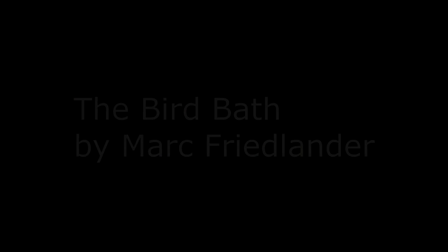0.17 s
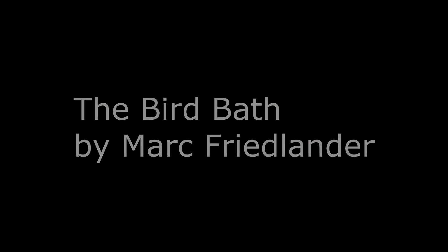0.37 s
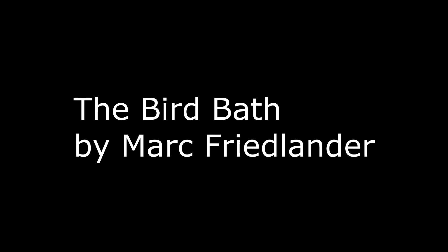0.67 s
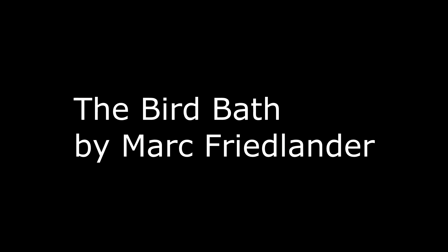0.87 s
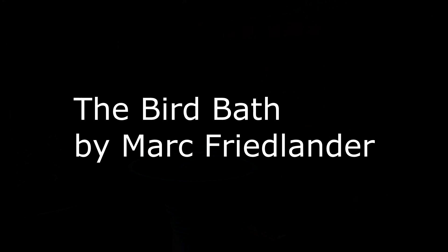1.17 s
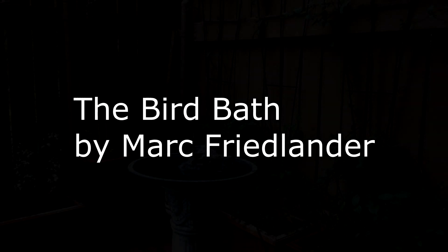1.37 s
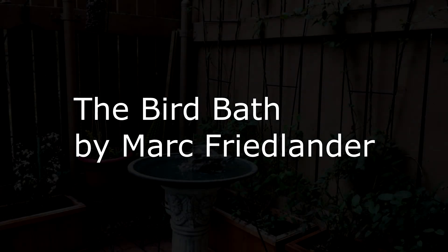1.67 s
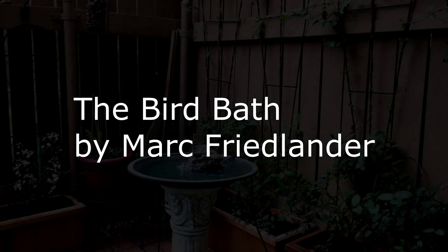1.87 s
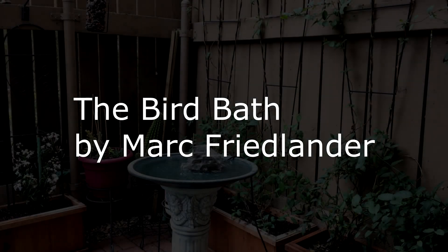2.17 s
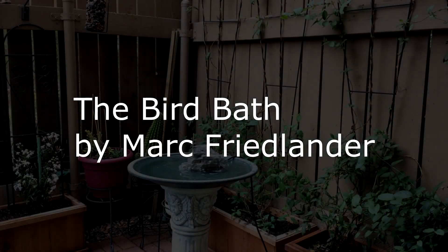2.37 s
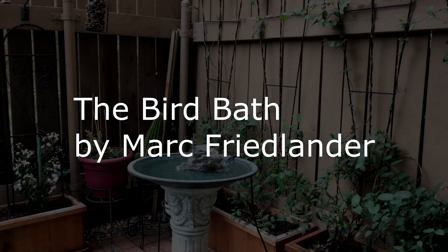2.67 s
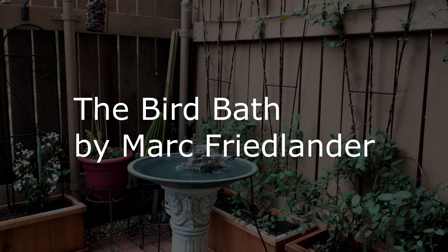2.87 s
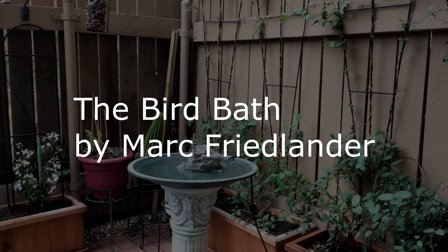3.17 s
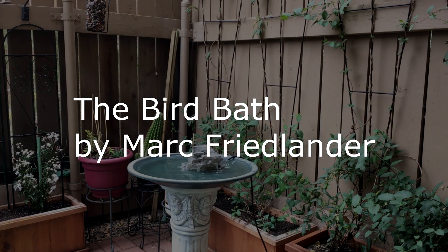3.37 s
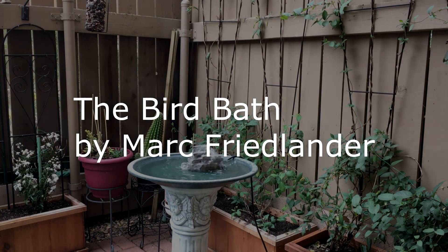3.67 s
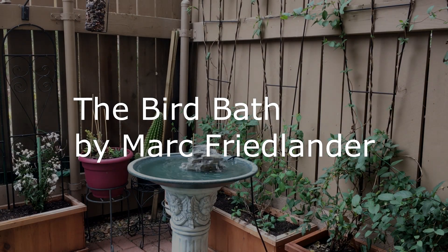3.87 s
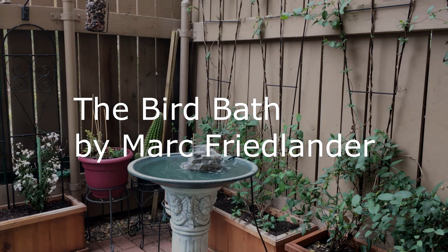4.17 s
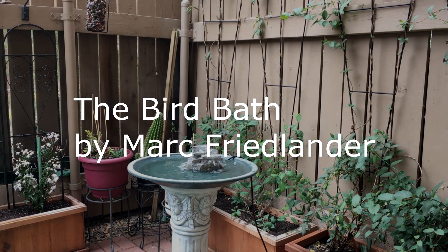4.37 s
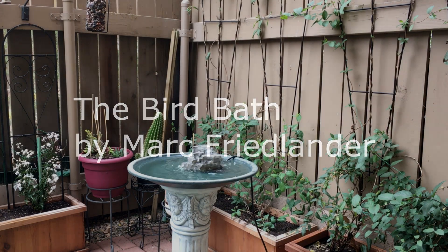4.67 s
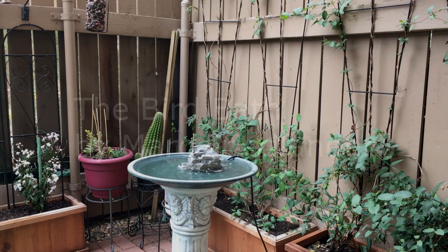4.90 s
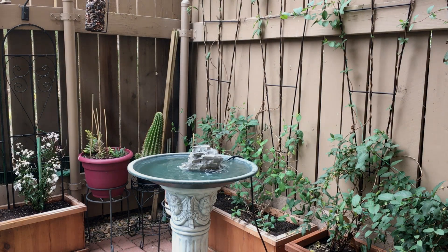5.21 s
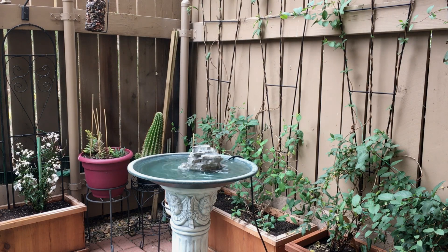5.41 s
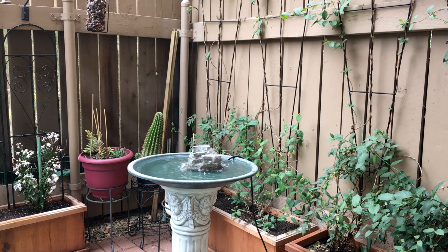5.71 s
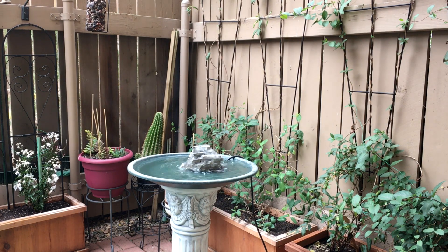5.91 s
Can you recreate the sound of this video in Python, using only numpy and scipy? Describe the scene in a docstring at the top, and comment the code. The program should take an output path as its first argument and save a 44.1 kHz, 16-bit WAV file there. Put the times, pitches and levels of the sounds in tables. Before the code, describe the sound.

Water drips and gurgles into a shallow basin, fading in, with brief falling chirps and a passing engine swelling midway behind a low rumble.

```python
"""On a fenced patio a small fountain trickles into a birdbath; the sound fades in.
Splashes and drops are short noisy rings; bubbles, plinks and glugs are decaying sines.
Nearby birds chirp in falling tones with overtones, and a farther one trills with a fast warble.
Beyond the fence a vehicle accelerates past: engine harmonics through resonances, and tyre noise.
Farthest off, filtered noise makes the town's rumble and traffic; the pump's hum is two steady tones."""
import sys
import numpy as np
from scipy import signal
from scipy.fft import rfft, irfft, next_fast_len
from scipy.io import wavfile

SR = 44100
rng = np.random.default_rng(int(sys.argv[2]) if len(sys.argv) > 2 else 0)


def store_wav(level_fs):
    """Save 16-bit WAV to argv[1]."""
    pcm = np.round(np.clip(np.atleast_2d(level_fs), -1, 1) * 32767)
    wavfile.write(sys.argv[1], SR, pcm.T.astype(np.int16))


N = 266716
TIME = np.arange(N) / SR  # s

# the town's low rumble, spectrum shape: pitch_hz [Hz], relative_db [dB]
RUMBLE_SPECTRUM = [(20, -41), (30, -16), (40, -10.5), (60, 4), (85, -4.5), (115, -3), (160, -21.5),
                   (300, -59), (800, -56.5)]
# low surges, the brief one at 2.38 s a thump as the vehicle pulls away: # start_s [s, already at full height],
# length_s [s], level_db [dB]
RUMBLE_SURGES = [(0.496, 0.077, -41.5), (2.376, 0.032, -53), (3.447, 0.19, -58), (4.85, 1.6, -56)]
# distant traffic hiss, spectrum shape: pitch_hz [Hz], relative_db [dB]
TRAFFIC_SPECTRUM = [(60, -7.5), (160, 5), (290, -0.5), (480, -11.5), (1000, -16), (2500, -28.5),
                    (6000, -37), (10000, -37.5), (16000, -55)]
# steady tones of the pump: pitch_hz [Hz], level_db [dB rms, before a slight waver]
PUMP_HUM = [(119.95, -48.5), (239.9, -77.5)]
# resonances of the exhaust as heard over the fence: pitch_hz [Hz], relative_db [dB]
EXHAUST_RESONANCES = [(55, 5), (110, 7.5), (115, 11), (120, 3.5), (175, -15.5), (215, -11), (236, 4),
                      (252, -7), (272, 0), (298, -8.5), (325, -1), (340, 1.5), (356, -5), (385, -5.5),
                      (405, -14.5), (428, -1.5), (452, -19), (490, -23.5), (537, -16), (562, -32),
                      (590, -12.5), (650, -17.5), (810, -32), (875, -19.5), (1000, -28)]
# tyres on the road, spectrum shape: pitch_hz [Hz], relative_db [dB]
TYRE_SPECTRUM = [(25, -22), (60, 12), (150, -4), (330, 6), (520, -2.5), (680, 0.5), (900, -11.5),
                 (1200, -16.5), (2500, -30), (5000, -73)]
# thin high trills of the farther bird: start_s [s], length_s [s], pitch_hz [Hz], level_db [dB]
FAR_TRILLS = [(0.688, 0.081, 7400, -56), (1.148, 0.21, 7400, -64), (4.121, 0.077, 7530, -62),
              (4.746, 0.16, 7430, -56.5)]
# falling chirps nearby, some with a softer, lower side note:
# start_s [s], length_s [s], top_hz [Hz], last_hz [Hz], level_db [dB, before the effort curve]
NEAR_CHIRPS = [(0.754, 0.081, 3960, 2770, -40), (1.916, 0.073, 4176, 2800, -44.5),
               (2.197, 0.036, 3150, 2730, -47.5), (4.399, 0.066, 4095, 2826, -41.5),
               (4.445, 0.038, 3245, 2950, -43.5), (4.976, 0.035, 3260, 2930, -50),
               (4.983, 0.078, 4010, 2730, -44), (5.228, 0.04, 3585, 3070, -39),
               (5.261, 0.062, 4200, 3000, -36.5)]
# partials of a chirp: multiple [of its pitch], relative_db [dB]
CHIRP_OVERTONES = [(1, -0.5), (2, -19.5), (3, -17), (4, -37)]
# how long the patio echoes: pitch_hz [Hz], t60_s [s, at a linger of 1]
PATIO_DECAY = [(500, 0.15), (2000, 0.15), (4000, 0.17), (8000, 0.16), (15000, 0.22)]
# the fine spatter, spectrum shape: pitch_hz [Hz], relative_db [dB]
SPATTER_SPECTRUM = [(400, -44), (1000, -11), (2000, 11.5), (2700, -10), (3300, 4), (4200, -0.5),
                    (4900, -4.5), (6000, 1), (9300, -1.5), (12000, 5.5), (16000, 4)]
# glugs, where the stream digs in and drags air under:
# start_s [s], length_s [s], level_db [dB rms, before the echo], first_hz [Hz], last_hz [Hz]
STREAM_GLUGS = [(0.692, 0.036, -59, 1570, 1740), (0.729, 0.042, -60.5, 1800, 1820),
                (2.207, 0.11, -68, 1160, 1420), (2.326, 0.051, -63, 1690, 2240),
                (2.374, 0.097, -69, 1750, 1600), (2.471, 0.019, -54.5, 1930, 3020),
                (2.498, 0.024, -58.5, 2340, 2220), (2.678, 0.056, -66.5, 2230, 2200),
                (4.565, 0.11, -62, 1410, 1520), (4.665, 0.041, -58, 1860, 1950),
                (4.722, 0.028, -64, 2420, 2620), (4.761, 0.04, -58.5, 1790, 1870),
                (4.816, 0.054, -66.5, 2190, 2260), (4.861, 0.063, -60.5, 1820, 1370),
                (4.934, 0.027, -56.5, 1700, 2640)]
# the clearest short ringing plinks, from bubbles and small drops:
# start_s [s], level_db [dB, before a common trim], pitch_hz [Hz]
CLEAR_PLINKS = [(0.232, -44, 2320), (0.385, -45.5, 3130), (0.398, -45.5, 1740), (0.428, -44.5, 1003),
                (0.517, -47.5, 3450), (0.614, -34.5, 1680), (0.652, -43.5, 3700), (0.741, -44.5, 5050),
                (0.763, -48, 1120), (1.023, -43, 1174), (1.0455, -49, 4350), (1.232, -49, 4080),
                (1.3523, -44.5, 3680), (1.3784, -40.5, 958), (1.516, -48.5, 3140), (1.52, -49, 6370),
                (1.7015, -47.5, 3030), (1.7748, -42, 4260), (2.198, -45.5, 998), (2.473, -46, 1970),
                (2.505, -44, 2300), (2.508, -40.5, 1535), (2.588, -53, 860), (2.635, -34.5, 4150),
                (2.712, -59, 6400), (2.795, -47.5, 2630), (2.859, -44, 2570), (2.965, -44, 1970),
                (3.04, -51, 5330), (3.103, -47.5, 3460), (3.1858, -43.5, 3720), (3.57, -50, 1530),
                (3.607, -49, 3880), (3.636, -51, 1070), (3.657, -54, 5700), (3.72, -51.5, 1216),
                (3.882, -50, 2650), (3.989, -54, 1110), (3.97, -52, 3780), (4.055, -50.5, 1848),
                (4.085, -52.5, 1280), (4.178, -36.5, 3130), (4.361, -47.5, 1817), (4.442, -46.5, 2500),
                (4.59, -36, 1403), (4.643, -46.5, 5000), (4.679, -42, 1840), (4.7476, -52, 4330),
                (4.911, -51, 1540), (4.91, -47, 1037), (4.948, -47, 2570), (5.034, -49.5, 1000),
                (5.1606, -47.5, 3520), (5.4412, -47, 2470), (5.491, -53, 6060), (5.503, -49.5, 2650),
                (5.5788, -48, 1086), (5.625, -49, 1060), (5.828, -52, 990), (5.8863, -41.5, 1876)]
# the loudest drops that smack the water: start_s [s], level_db [dB, direct and fence echo together],
# pitch_hz [Hz, centre of the tick], ring [cycles], echo_db [dB, fence echo over the direct sound]
LOUD_DROPS = [(0.191, -33, 6200, 0.6, -10), (0.48, -33.5, 6300, 0.64, -2), (0.5892, -31, 8900, 1.3, -3),
              (0.674, -31.5, 5000, 0.55, -2), (0.977, -44, 4300, 1.4, -7), (1.0149, -37.5, 3440, 1, -2),
              (1.025, -36.5, 2330, 0.54, -1), (1.106, -39.5, 8340, 1.1, -14), (1.2755, -38, 5030, 0.28, -1),
              (1.5105, -39, 3540, 0.83, -4), (1.5835, -37, 3350, 0.73, 1), (1.6561, -50, 3830, 0.93, -2),
              (1.702, -48, 8300, 0.77, -9), (1.7724, -26, 7240, 0.76, 4), (1.97, -45, 6500, 0.98, -10),
              (1.998, -36, 4800, 1.9, -8), (2.0287, -30.5, 3470, 0.47, -1), (2.074, -36.5, 3700, 2.4, -16),
              (2.0745, -37.5, 8600, 1.7, 3), (2.2195, -36, 5250, 0.72, -8), (2.2486, -39.5, 8900, .8, -6),
              (2.2625, -41, 4060, 0.61, -2), (2.331, -35.5, 4350, 0.42, 0), (2.4118, -40.5, 6840, 0.93, -6),
              (2.474, -33, 2740, 0.49, 1), (2.506, -38, 7700, 0.61, 1), (2.57, -46, 8200, 1.4, -11),
              (2.613, -47, 5330, 1.3, -7), (2.764, -48, 7200, 1, -14), (2.8215, -27, 8960, 1.4, 8),
              (2.8598, -34.5, 3700, 0.81, -10), (2.921, -31.5, 8340, 0.75, -11),
              (3.021, -43, 3960, 0.12, 0), (3.069, -43, 4130, 0.53, 8), (3.305, -37.5, 3640, 0.6, 5),
              (3.4247, -36.5, 6900, 0.64, -16), (3.6399, -40, 9400, 1, -7), (3.7078, -32, 10600, 0.6, -5),
              (3.895, -23, 4320, 0.52, -5), (4.004, -37.5, 3300, 0.41, -10), (4.0593, -38, 4800, 0.34, 1),
              (4.1753, -38.5, 3600, 0.8, -10), (4.2041, -38, 7300, 0.69, -13),
              (4.2449, -36.5, 7400, 0.77, -11), (4.304, -41, 6140, 0.76, -10), (4.364, -47, 8540, .5, -9),
              (4.457, -32.5, 4700, 0.76, -6), (4.612, -37, 5000, 0.2, -3), (4.868, -31.5, 3600, 0.19, 0),
              (5.0908, -41.5, 5360, .8, -4), (5.1863, -42, 5800, 1.9, -6), (5.3332, -39, 5000, 0.41, -14),
              (5.372, -39, 5960, 0.33, 1), (5.4407, -39.5, 3500, 0.81, -7), (5.5196, -47.5, 9150, 1.7, -8),
              (5.5965, -44, 7050, 1.5, -13), (5.6996, -44.5, 5180, 1.3, -5), (5.7594, -45, 4200, 1.5, -18),
              (5.7804, -44, 6600, 0.58, -6), (5.814, -40, 4250, 1.6, 0), (5.886, -35, 3470, 0.56, -5)]
# the microphone's treble shelf: pitch_hz [Hz], gain_db [dB]
MICROPHONE_SHELF = [(20, -2), (9400, 0.5), (10300, -4.5), (11200, -6), (16000, -9)]

RUMBLE_DB, SURGE_ATTACK_S, SURGE_RELEASE_S = -47, 0.017, 0.17
# the vehicle pulls hard for a moment; its firing rate climbs evenly, then holds
PULL_S, PULL_LENGTH_S, PULL_ATTACK_S, PULL_RELEASE_S = 2.38, 0.98, 0.19, 0.66
PULL_DB, COAST_DB = -45, -61
NEAREST_S, PASS_DB_PER_S = 3.44, 10
FIRING_HZ, CLIMB_HZ_PER_S, TOP_FIRING_HZ = 58, 10.6, 72.4  # the first is the rate at PULL_S
CHIRP_RISE, CHIRP_CREST = 0.1054, 0.33  # fraction of the pitch, fraction of the length
TRICKLE_DB = -69.5  # mean strength of the unsteady trickle, which runs throughout
GLUG_SPREAD_OCT, GLUG_BUBBLES_PER_S = 0.29, 300
FENCE_ECHO_S = 0.0039
FADE_START_S, FADE_END_S = 0.115, 2.39
BAND_EDGE_HZ = 15850


def amp(db):
    """Decibels to gain."""
    return 10 ** (np.asarray(db) / 20)


def unit(x):
    """Scales to rms 1."""
    return x / np.sqrt(np.mean(x ** 2) + 1e-20)


def response(points, hz):
    """Reads a table along a log-frequency axis."""
    table_hz, value = np.transpose(points)
    return np.interp(np.log(hz + 1), np.log(table_hz), value)


def filtered(x, points):
    """Applies a table of dB gains over frequency."""
    size = next_fast_len(N + 4000)
    gain = amp(response(points, np.fft.rfftfreq(size, 1 / SR)))
    return irfft(rfft(x, size) * gain, size)[:N]


def colour(x, points):
    """Filters x by a spectrum table, then scales it to rms 1."""
    return unit(filtered(x, points))


def drift(rate):
    """Random wandering of rms 1: straight lines between rate chance values a second."""
    knots = rng.standard_normal(size=10000)
    return unit(np.interp(TIME * rate, np.arange(len(knots)), knots))


def swell(s, length, attack, release):
    """Rises to 1 by time s, holds for length, and falls back to 0."""
    rising = (TIME - s) / attack
    falling = (s + length - TIME) / release
    return np.clip(np.minimum(rising, falling) + 1, 0, 1)


def add(mix, s, sound):
    """Mixes a sound in at time s."""
    part = mix[max(round(s * SR), 0):][:len(sound)]
    part += sound[:len(part)]


def patio(x, slap_db, tail_db, slap_s=0.0039, linger=1):
    """One reflection and a short scatter between the fences, which dies away by pitch."""
    taps = rng.standard_normal(SR // 2) * (rng.random(SR // 2) < 4000 / SR)  # 4000 reflections a second
    hz, t, z = signal.stft(taps, SR, nperseg=128)
    t60 = linger * response(PATIO_DECAY, hz)[:, None]
    tail = signal.istft(z * amp(-60 * t / t60), SR, nperseg=128)[1]
    echo = np.zeros(SR // 2)
    echo[0] = 1  # direct sound
    add(echo, slap_s, amp(slap_db) * np.ones(1))
    add(echo, 0.005, amp(tail_db) * tail / np.linalg.norm(tail))
    return signal.fftconvolve(x, echo / np.linalg.norm(echo))[:N]


def rumble():
    """The town's low rumble as steady filtered noise, plus a few low surges, one of them the vehicle's thump."""
    surges = sum(amp(db) * swell(s, length, SURGE_ATTACK_S, SURGE_RELEASE_S)
                 for s, length, db in RUMBLE_SURGES)
    return (amp(RUMBLE_DB) + surges) * colour(rng.standard_normal(N), RUMBLE_SPECTRUM)


def background(traffic_db=-55, hum_waver_db=0.8):
    """Distant traffic as filtered noise, and the mains hum of the pump as wavering tones."""
    hum = sum(amp(db) * np.sqrt(2) * np.cos(2 * np.pi * hz * TIME) for hz, db in PUMP_HUM)
    traffic = amp(traffic_db) * colour(rng.standard_normal(N), TRAFFIC_SPECTRUM)
    return traffic + hum * amp(hum_waver_db * drift(6.0))


def vehicle(waver=0.0038, tyre_db=-6.5, shudder=0.23, fading_db=1.3):
    """Unevenly firing harmonics climb through fixed resonances; tyre noise is strongest against them at the pass."""
    hz = np.minimum(FIRING_HZ + CLIMB_HZ_PER_S * (TIME - PULL_S), TOP_FIRING_HZ)
    turns = np.cumsum(hz * (1 + waver * drift(25.04))) / SR
    engine = np.zeros(N)
    for k in range(1, 14):
        # each harmonic fades by itself on its way over the fence
        gain = amp(response(EXHAUST_RESONANCES, k * hz) + fading_db * drift(9))
        engine += gain * np.sin(2 * np.pi * (k * turns + rng.random()))
    engine = unit(engine * (1 + shudder * drift(60)))
    tyres = colour(rng.standard_normal(N), TYRE_SPECTRUM)
    tyre_gain = amp(tyre_db - PASS_DB_PER_S * abs(TIME - NEAREST_S))
    pull = swell(PULL_S, PULL_LENGTH_S, PULL_ATTACK_S, PULL_RELEASE_S)
    level = amp(COAST_DB) + amp(PULL_DB) * pull
    return level * (engine + tyre_gain * tyres)


def trills(rasp=0.016, pulsing=0.8, warble_hz=45, warble=0.05):
    """A farther bird: one very high tone arches, warbling in pitch and pulsing in strength together."""
    out = np.zeros(N)
    for s, length, pitch_hz, db in FAR_TRILLS:
        u = np.linspace(0, 1, int(length * SR))
        arch = np.sqrt(abs(np.sin(np.pi * u)))
        shake = np.sin(2 * np.pi * warble_hz * length * u)
        hz = pitch_hz * (1 + warble * shake + 0.35 * (arch - 1) + rasp * drift(540)[:len(u)])
        tone = np.sin(2 * np.pi * np.cumsum(hz) / SR)
        add(out, s, amp(db) * arch * (1 + pulsing * shake) / 2 * tone)
    return out


def chirps(rasp=0.02, flutter=0.4):
    """Each nearby chirp lifts a little, then slurs down and levels off, rasping in pitch and strength."""
    out = np.zeros(N)
    for s, length, top_hz, last_hz, db in NEAR_CHIRPS:
        u = np.linspace(0, 1, int(length * SR))
        lift = CHIRP_RISE * np.maximum(1 - u / CHIRP_CREST, 0) ** 2
        past_crest = np.maximum(u - CHIRP_CREST, 0) / (1 - CHIRP_CREST)
        slur = np.sin(np.pi / 2 * past_crest) ** 2
        hz = top_hz * (1 - lift) + (last_hz - top_hz) * slur
        phase = 2 * np.pi * np.cumsum(hz * (1 + rasp * drift(1210)[:len(u)])) / SR
        effort = np.interp(u, [0, 0.15, 0.45, 0.7, 1], [0.033, 0.13, 0.22, 0.43, 0.16])
        effort *= 1 + flutter * drift(644)[:len(u)]
        voice = sum(amp(part_db) * np.sin(k * phase) for k, part_db in CHIRP_OVERTONES)
        add(out, s, amp(db) * effort * voice)
    return out


def tick(hz, cycles=1.0, spray=0.99, spray_s=0.0012, snap=0.73):
    """A drop's smack: one blow and a tiny burst of spray ring for a few cycles, with a bright snap on top."""
    t = np.arange(200) / SR
    push = spray * rng.standard_normal(len(t)) * np.exp(-t / spray_s)
    push[0] = 1  # the blow
    ring = np.sin(2 * np.pi * hz * t) * t * np.exp(-t * hz / cycles)
    ring /= np.linalg.norm(ring)
    add(ring, 0, snap * np.array([0.5, -1, 0.5]))
    smack = np.convolve(push, ring)
    return 2 * smack / np.linalg.norm(smack)


def bubble(hz, ring, cycles=12, rise=0.01):
    """Trapped air rings for cycles times ring; its pitch climbs as it nears the surface."""
    t = np.arange(2000) / SR
    age = t * hz / (cycles * ring)  # in decay times
    phase = 2 * np.pi * np.cumsum(hz * (1 + rise * np.minimum(age, 5))) / SR
    return np.sin(phase) * np.exp(-age) * (1 - np.exp(-t * hz))


def near_plinks(trim_db=-1, tick_db=-8, satellite_db=-12, ring=0.79):
    """The clearest plinks, from bubbles and small drops: a ring, a tick at its start and three small rings."""
    out = np.zeros(N)
    for s, db, hz in CLEAR_PLINKS:
        add(out, s, amp(db + trim_db) * bubble(hz, ring))
        add(out, s, amp(db + tick_db) * tick(min(1.96 * hz, SR / 4), snap=0.42))
        for delay, pitch in rng.random((3, 2)):
            satellite = bubble(hz * 1.8 ** (pitch - 0.3), ring)
            add(out, s + 0.0085 * delay, amp(db + satellite_db) * satellite)
    return out


def near_drops(spray=0.22, snap=0.89):
    """The drops that stand out: longer rings snap less; where the rock hides one, its fence echo is the louder."""
    out = np.zeros(N)
    for s, db, hz, cycles, echo_db in LOUD_DROPS:
        drop_snap = snap * (0.5 / max(cycles, 0.5)) ** 2
        smack = amp(db) * tick(hz, cycles, spray=spray, snap=drop_snap)
        smack /= np.hypot(1, amp(echo_db))  # share the energy between direct sound and echo
        add(out, s, smack)
        add(out, s + FENCE_ECHO_S, amp(echo_db) * smack)
    return out


def spatter(per_s=42, spread_db=3.0, scatter_s=0.007, level_db=-3.5, cycles=1.04, snap=0.27):
    """A steady run of tiny splashes at one spot, each two droplets of like size."""
    out = np.zeros(N)
    count = int(per_s * N / SR)
    for k, (when, size, pitch) in enumerate(rng.random((count, 3))):
        s = (k + 4 * when) % count / per_s  # nearly even spacing
        db = spread_db * min(-np.log(1 - size), 3)  # mostly small, a few large
        delays = rng.exponential(1, size=2)
        spreads = rng.standard_normal(size=2)
        for delay, spread in zip(delays, spreads):
            hz = min(3000 * 4.8 ** pitch * 1.218 ** spread, SR / 3)
            droplet = tick(hz, cycles, spray=0.12, snap=snap)
            add(out, s + scatter_s * delay, amp(db - 2 * delay) * droplet)  # later ones are weaker
    return amp(level_db) * colour(out, SPATTER_SPECTRUM)


def gurgle(per_s, centre_hz, octaves, spread_db, level_db, ring):
    """A stream of short-lived bubbles around a pitch, where the trickle enters the pool."""
    out = np.zeros(N)
    for when, size, pitch, life in rng.random((int(per_s * N / SR), 4)):
        db = spread_db * min(-np.log(1 - size), 2.5)
        hz = centre_hz * 2 ** (octaves * (pitch - 0.5))
        add(out, when * N / SR, amp(db) * bubble(hz, ring * (0.5 + life), rise=0.051))
    return amp(level_db) * unit(out)


def glugs(ring=0.29, sag_db=6.5):
    """Each glug is a quick chain of bubbles that glides as their size changes, and weakens as it goes."""
    out = np.zeros(N)
    for s, length, db, first_hz, last_hz in STREAM_GLUGS:
        chain = np.zeros(SR // 4)
        count = max(round(GLUG_BUBBLES_PER_S * length), 2)
        for k, (when, pitch) in enumerate(rng.random((count, 2))):
            u = (k + when) / count  # place along the glug, 0 to 1
            hz = (first_hz + (last_hz - first_hz) * u) * 2 ** (GLUG_SPREAD_OCT * (pitch - 0.5))
            add(chain, u * length, amp(-sag_db * u) * bubble(hz, ring))
        add(out, s, amp(db) * chain * np.sqrt(length * SR) / np.linalg.norm(chain))
    return out


def trickle(fizz_db=-14, flicker_db=1.5, unsteady_db=2.0, unsteady_per_s=22):
    """Splashes at three spots with their own echoes, flickering fizz, bubbles of four sizes and glugs."""
    splashes = sum(patio(spatter(), slap_db=-5, tail_db=-5.5, slap_s=s) for s in (0.0031, 0.0039, 0.0052))
    fizz = amp(fizz_db + flicker_db * drift(22)) * colour(rng.standard_normal(N), SPATTER_SPECTRUM)
    large = gurgle(per_s=82, centre_hz=1049, octaves=0.876, spread_db=4.0, level_db=-69.5, ring=0.44)
    middle = gurgle(per_s=110, centre_hz=1779, octaves=1.0, spread_db=6.0, level_db=-72.0, ring=0.52)
    # the two smaller sizes are set relative to the unsteady flow, and follow it
    small = gurgle(per_s=120, centre_hz=3460, octaves=0.75, spread_db=5.5, level_db=-5.5, ring=0.45)
    tiny = gurgle(per_s=63, centre_hz=6300, octaves=1.08, spread_db=5.0, level_db=-15, ring=0.55)
    flow = amp(TRICKLE_DB + unsteady_db * drift(unsteady_per_s))
    bubbles = large + middle + (small + tiny) * flow + glugs()
    return (splashes + fizz) * flow + patio(bubbles, slap_db=-12.5, tail_db=-1.5)


def scene():
    """Street and town beyond the fence, birds, and the water in the patio's echo."""
    street = rumble() + background() + vehicle()
    song = patio(trills(), slap_db=-7, tail_db=0, slap_s=0.024, linger=2)
    song += patio(chirps(), slap_db=-9.5, tail_db=-2.0, slap_s=0.007, linger=1.84)
    plinks = patio(near_plinks(), slap_db=-9, tail_db=-5.5)
    drops = patio(near_drops(), slap_db=-19, tail_db=-5.5, slap_s=0.015)
    return (street + song + plinks + drops + trickle())[None]


def record(dry):
    """An even fade-in, the microphone's duller top and the recorder's band limit."""
    fade = np.clip((TIME - FADE_START_S) / (FADE_END_S - FADE_START_S), 0, 1)
    heard = fade * filtered(dry[0], MICROPHONE_SHELF)
    band_limit = signal.firwin(401, BAND_EDGE_HZ, window=("kaiser", 9), fs=SR)
    return signal.oaconvolve(heard, band_limit, "same")[None]


dry = scene()
out = record(dry)
store_wav(out)
```